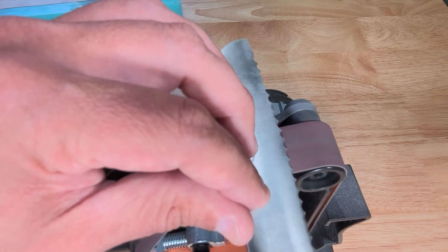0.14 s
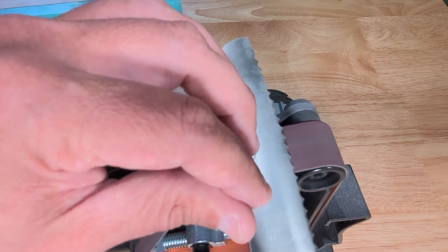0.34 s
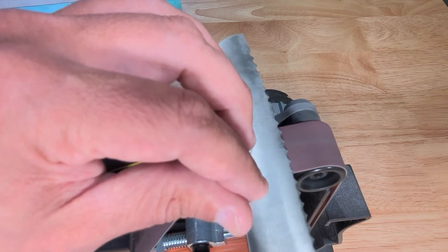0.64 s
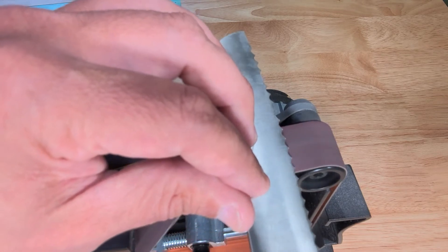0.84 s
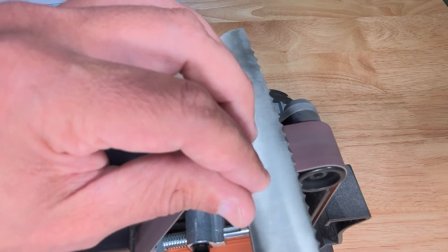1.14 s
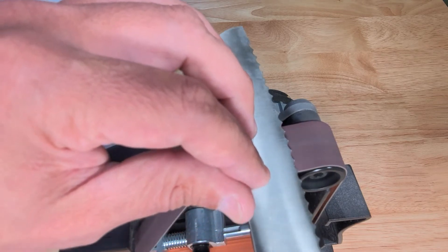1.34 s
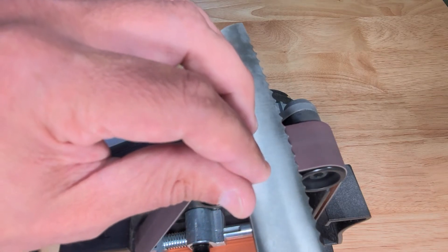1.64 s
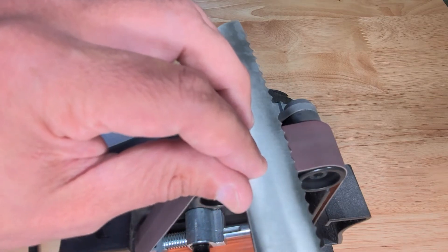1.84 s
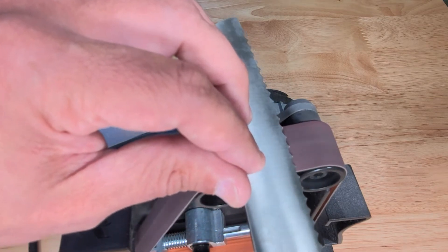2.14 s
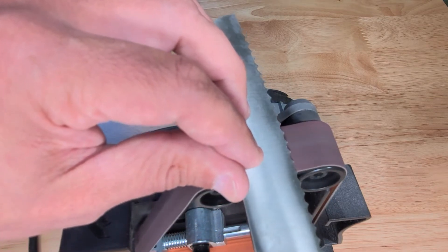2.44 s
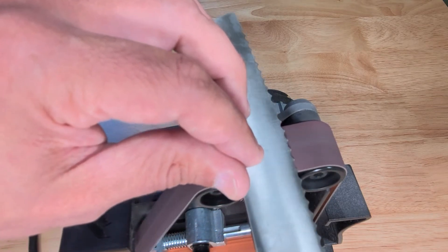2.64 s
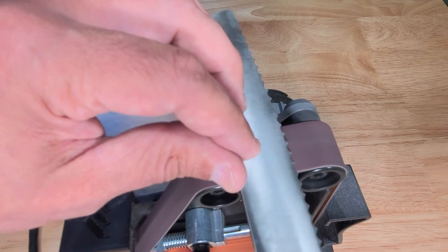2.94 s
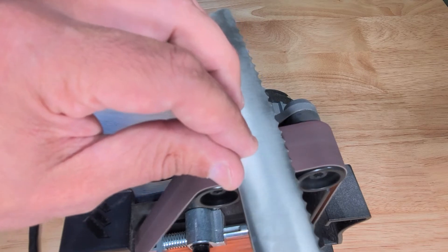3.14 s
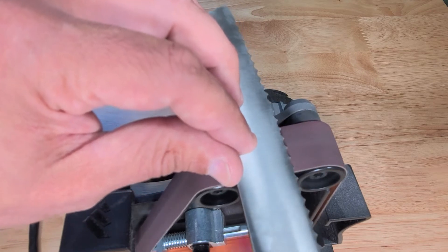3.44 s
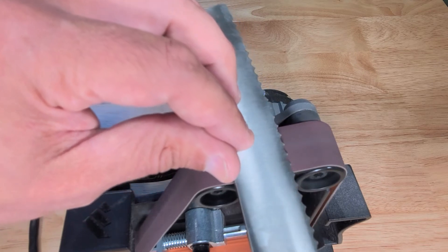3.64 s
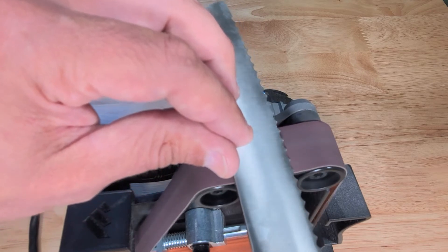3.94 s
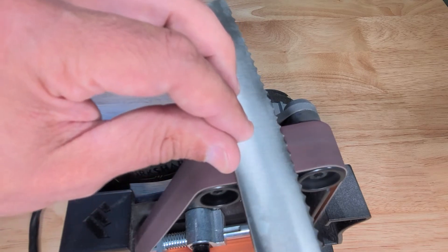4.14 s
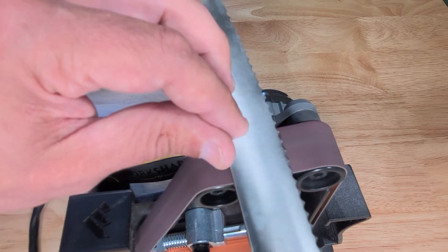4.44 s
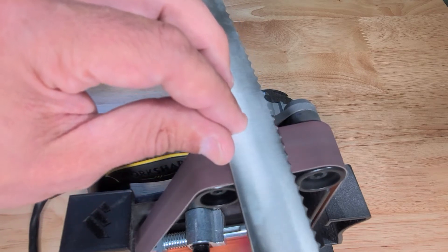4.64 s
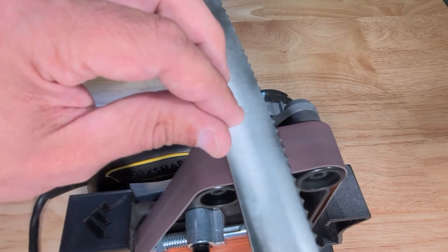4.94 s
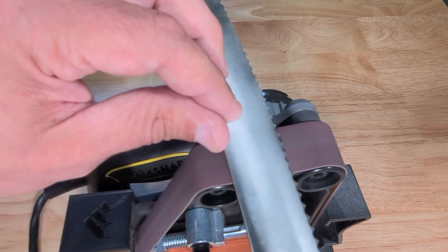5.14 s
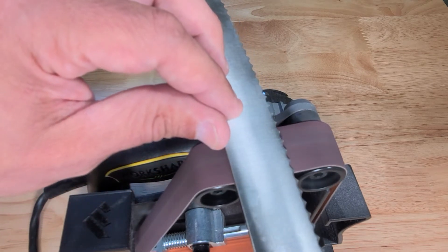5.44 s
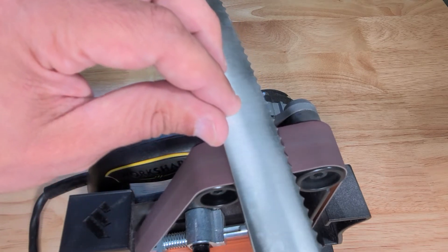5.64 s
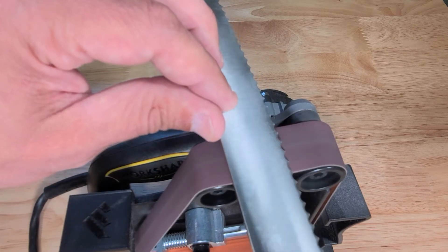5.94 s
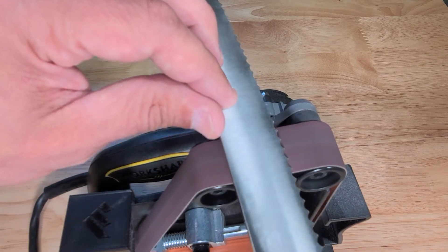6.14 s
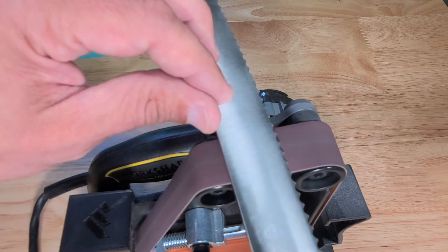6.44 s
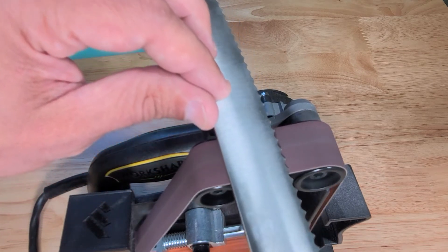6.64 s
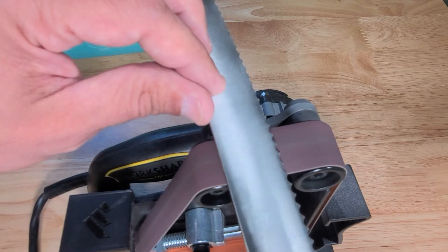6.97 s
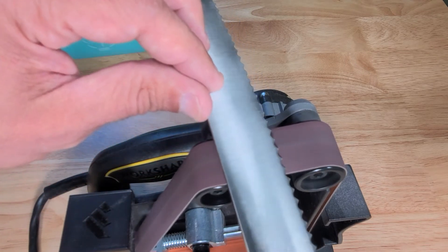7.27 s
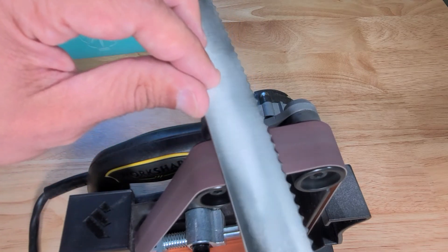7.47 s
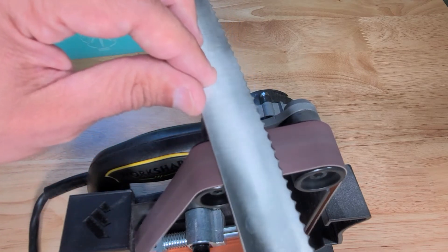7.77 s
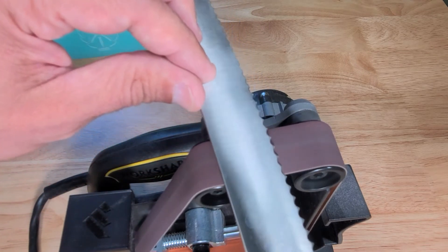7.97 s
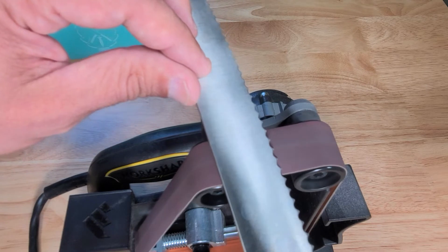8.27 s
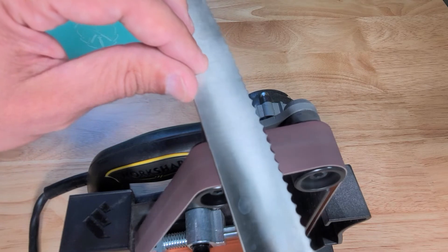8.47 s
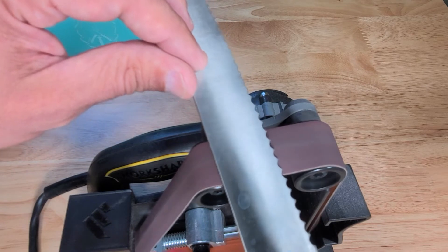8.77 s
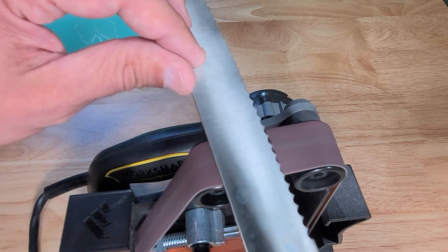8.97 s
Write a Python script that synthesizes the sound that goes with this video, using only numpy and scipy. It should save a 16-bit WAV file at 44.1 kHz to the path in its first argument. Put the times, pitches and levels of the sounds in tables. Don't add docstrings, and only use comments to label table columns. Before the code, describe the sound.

A small belt sander hums steadily while a serrated steel blade is drawn across the grit, giving a bright, metallic, pulsing hiss that peaks near three seconds.

```python
import sys
import numpy as np
from scipy import signal
from scipy.fft import rfft, irfft, next_fast_len
from scipy.io import wavfile
from scipy.ndimage import uniform_filter1d

SR = 44100
rng = np.random.default_rng(int(sys.argv[2]) if len(sys.argv) > 2 else 0)


def generate_wav(signal):
    frames = np.transpose(np.atleast_2d(signal))
    scaled = np.clip(frames, -1, 1) * 32767
    pcm = np.round(scaled).astype(np.int16)
    wavfile.write(sys.argv[1], SR, pcm)


def gain_from_db(level_db):
    decades = np.asarray(level_db, float) / 20
    return 10 ** decades


N = 401751
CONTROL_STEP = 40
TIME = np.arange(N) / SR
COARSE = np.arange(N // CONTROL_STEP + 2) * CONTROL_STEP / SR

PLACES_S = [
    1.0,
    2.702,
    4.9,
    7.0,
]
# lift_s, full_bite_s, ease_off_s, push_db, lift_depth_db
TEETH = [(-0.3, -0.064, 0.17, 1.5, 5.0), (0.487, 0.614, 0.8, 1.65, 3), (1.017, 1.372, 1.36, 2, 3),
         (1.617, 1.89, 1.95, 4, 4), (2.163, 2.455, 2.86, 7, 3), (2.83, 3.044, 3.15, 9.5, 3.5),
         (3.455, 3.78, 3.76, 7, 6), (4.094, 4.312, 4.52, 7, 4), (4.575, 4.843, 4.93, 4.5, 4.5),
         (5.04, 5.206, 5.6, 5, 4), (5.64, 5.852, 6.05, 4.5, 8), (6.15, 6.435, 6.57, 4.5, 9.5),
         (6.701, 6.944, 7.08, 4, 5), (7.308, 7.55, 7.72, 4, 3.5), (7.87, 8.13, 8.22, 3, 5),
         (8.293, 8.5, 8.65, 2.5, 3.5), (8.745, 9.03, 9.14, 3.5, 5)]
CATCH_S = 0.088
# start_s, length_ms, change_db
SKIPS = [(0.302, 12, 4), (0.439, 8, 6), (1.546, 8, 6), (1.566, 78, -3.5), (1.859, 75, 1), (2.049, 12, -6),
         (2.139, 33, -6), (2.682, 11, 2), (2.776, 40, 3.5), (2.832, 26, -4), (3.019, 18, 1.5),
         (3.225, 82, -5), (3.342, 26, -4), (3.706, 13, 4.5), (3.991, 20, 3.8), (4.594, 8, 5.5),
         (4.963, 26, -3), (5.42, 8.1, -4), (5.523, 40, 3.3), (5.763, 5.8, 8), (5.923, 68, 1.5),
         (5.998, 37, -4.5), (6.619, 17, -2), (6.715, 82, -5), (7.693, 24, -3), (7.974, 8, 5),
         (8.197, 40, -3), (8.299, 24, -5), (8.491, 12, 5.5), (8.91, 26, -3)]
# pitch_hz, width_hz, then level_db at each of the four places
BLADE_MODES = [(1660, 230, -13, -11.5, -10.5, -14), (1879, 134, -10.5, -6.5, -12, -6.5),
               (2577, 196, -5, -8, -4, -14), (2957, 154, -4.5, -5.5, -3.5, -8),
               (3700, 520, -11, -15.5, -16, -25), (4043, 430, -9.5, -5.5, -12.5, -9),
               (4903, 160, -4, -1.5, -8, -13), (5126, 360, -10, -8, -3, -0.5),
               (5540, 250, -2, -21, -21.5, -6), (6300, 300, -13, -20, -2, 1),
               (6660, 205, -5, -0.5, -14, -5.5), (7060, 400, -13, -14, -4, -5.5),
               (7470, 220, -9, -10, -8, -4.5)]
# pitch_hz, width_hz, then level_db at each of the four places
EDGE_MODES = [(7970, 230, 0, -3, 4, -0.5), (8290, 180, -11, -4.5, 0, 0.5), (8610, 590, -8.5, -2.5, -4, -9),
              (10710, 410, 0, -2.5, -15, -6), (11590, 114, -5, 0.5, 8.5, 6), (12170, 190, -3, 3.5, -9, -3),
              (12410, 250, -4, -12, -4, 5), (13060, 250, 7, 1, -1.5, -5), (13530, 280, -6, -9, 3, -14),
              (13960, 150, -5, -5, -9, -6), (14580, 360, 2, -6, -10, 4), (15100, 400, -4, -6, -1, -15),
              (15400, 280, -10, -5, -9, -17)]
GROUP_SPLIT_HZ = (2250, 3400, 5900, 9800)
IDLE_DB = (-41.5, -42, -57, -44.5, -30)
# share_at_catch (0-1), sag_db_per_s, delay_s
BITE_ANSWER = [(.1, 14, 0.02), (.32, 22.5, -0.014), (.43, 23, 0.00004), (1.06, 36, 0.053)]
GROUP_DB = [(-30, -40.5, -31.5, -36.5), (-29, -33, -36, -31), (-27.5, -31, -25, -26.5),
            (-22.5, -28.5, -25, -26)]
GROUP_SWING = [(2.8, 1.37, 1.1, 0.83), (1.65, 0.68, 0.63, 1.8), (1.2, .8, 1.07, 1.1),
               (0.33, 0.48, .42, 0.86)]
# pitch_hz,
# width_hz, tip_depth (0-1), heel_depth (0-1)
NOTCHES = [(1165, 270, 0.11, 0.3), (2253, 77, 0.6, 0.19), (3330, 150, 0.1, 0.6), (4500, 100, .4, 0.57),
           (9960, 2550, 0.54, 0.33)]

MAINS_HZ = 59.983
PULSE_TURN, PULSE_START = 0.31, 0.68
# left_db, right_db (rms)
HUM = [(-63, -68), (-45.5, -51), (-43, -52.5), (-30.5, -36), (-33, -42.5), (-40.5, -55), (-64, -49),
       (-68, -56), (-65, -75.5), (-46, -62), (-46.5, -60), (-57, -58), (-44.5, -47.5), (-47.5, -63),
       (-39.5, -51.5), (-41, -60), (-46.5, -58), (-67, -73.5), (-57, -69), (-61, -67), (-53.5, -66.5)]
ROLLER_HZ, ROLLER_DB = 62.6, -46.5
PULLEY_TURN_S = 0.1716
# pitch_hz, level_db_per_hz
RUMBLE = [(15, -88), (30, -80), (55, -67.5), (95, -69.5), (108, -84), (135, -68), (160, -71), (200, -66),
          (230, -61.5), (400, -66), (900, -60.5), (1200, -64.5), (2200, -68.5), (6000, -66)]
# pitch_hz, width_hz, level_db_per_hz
HOUSING = [(59.7, 5.1, -64), (156.4, 16, -56.5), (196, 23, -55.5), (273, 14, -52.5), (317.5, 8.1, -52.5),
           (342, 14, -53.5), (389.4, 8.6, -57.5), (438, 27, -58.5), (513, 27, -57), (632, 14, -55.5),
           (757.6, 14, -53), (790, 27, -60), (929, 28, -53), (980, 38, -58.5)]

# pitch_hz, gain_db, phase_rad, likeness (0-1)
PORTS = [(40, -1.0, -0.68, 0.93), (70, -2.5, -0.75, 0.99), (120, -6.4, -1.14, 0.88),
         (180, -5.8, -0.69, 0.76), (250, -6.1, -1.78, 0.96), (350, -9.7, -2.7, 0.82),
         (500, -8.8, -3.33, 0.82), (800, -7.9, -3.69, 0.86), (1300, -10.0, -3.84, 0.86),
         (2000, -13.0, -4.09, 0.85), (3200, -15.2, -4.25, 0.78), (5000, -20.1, -4.56, 0.68),
         (8000, -24.1, -4.64, 0.65), (12000, -25.5, -4.62, 0.49), (15500, -29.2, -4.68, 0.35)]
CUTOFF_HZ = 15770


def blade():
    grains = [grit(per_s=14000, spread_db=3.5) for _ in range(3)]
    groups = np.zeros((5, N))
    powers = np.zeros((5, len(COARSE)))
    for k, (hz, width, *place_db) in enumerate(BLADE_MODES + EDGE_MODES):
        group = np.searchsorted(GROUP_SPLIT_HZ, hz)
        gain = gain_from_db(np.interp(COARSE, PLACES_S, place_db) + 1.27 * drift(2.6))
        powers[group] += gain ** 2 * width
        flutter = smooth(gain * gain_from_db(1.17 * drift(12.5)))
        groups[group] += flutter * resonate(grains[k % 3], hz, width) * (-1) ** (k // 3)

    bites_db = [bite_db(*group) for group in zip(BITE_ANSWER, GROUP_DB, GROUP_SWING)]
    platen_db = 0.47 * bites_db[1] - 24.5 + 4.2 * COARSE / COARSE[-1]
    levels_db = [platen_db, *bites_db]
    chatter_shares = (0.18, 0.48, 0.89, 0.71, 0.77)
    chatter = chatter_db()
    out = np.zeros(N)
    for ring, power, db, idle_db, share in zip(groups, powers, levels_db, IDLE_DB, chatter_shares):
        level = np.hypot(smooth(gain_from_db(db)), gain_from_db(idle_db))
        out += level * gain_from_db(share * chatter) * rms_one(ring / smooth(np.sqrt(power)))
    return gain_from_db(6.0) * near_echoes(out, count=7, echo_db=-3.0, decay_s=0.0046)


def bite_db(answer, level_db, swing):
    lift, full, ease, push_db, depth_db = np.transpose(TEETH)
    caught, sag_db_per_s, delay = answer
    catch_db = caught * (push_db + depth_db) - depth_db
    sagged_db = push_db - sag_db_per_s * (ease - full)
    s = np.ravel([lift, lift + CATCH_S, full + delay, ease], order="F")
    db = np.ravel([-depth_db, catch_db, push_db, sagged_db], order="F")
    bite = np.interp(COARSE, np.maximum.accumulate(s), db)
    return np.interp(COARSE, PLACES_S, level_db) + np.interp(COARSE, PLACES_S, swing) * bite


def chatter_db():
    out = smooth(0.3 * drift(11) + 1.36 * drift(77) + 1.3 * drift(200))
    for s, ms, db in SKIPS:
        half = int(ms * SR / 1000) + 1
        at = round(s * SR) - half
        out[at:at + 2 * half] += 1.3 * db * np.hanning(2 * half)
    return out


def grit(per_s, spread_db):
    hardness_db = spread_db * np.minimum(rng.exponential(1, N), 4.5)
    sizes = gain_from_db(hardness_db) * rng.choice([-1, 1], N)
    return rms_one(sizes * (rng.random(N) < per_s / SR))


def resonate(x, hz, width):
    r = np.exp(-np.pi * width / SR)
    poles = [1, -2 * r * np.cos(2 * np.pi * hz / SR), r * r]
    return signal.lfilter([(1 - r * r) / 2, 0, (r * r - 1) / 2], poles, x)


def near_echoes(x, count, echo_db, decay_s):
    size = next_fast_len(N + 3000)
    taps = np.arange(1, 2500)
    spectrum, out = rfft(x, size), 0
    for k in range(count):
        echo = rng.standard_normal(len(taps)) * np.exp(-taps / (decay_s * SR))
        comb = rfft(np.r_[1, echo * gain_from_db(echo_db) / np.sqrt(np.sum(echo ** 2))], size)
        comb /= np.sqrt(uniform_filter1d(abs(comb) ** 2, size=3000))
        away = np.clip(TIME / TIME[-1] * (count - 1) - k, -1, 1)
        share = np.cos(np.pi / 2 * away) ** 1.5
        out += share * irfft(spectrum * comb, size)[:N]
    return out


def motor():
    roller_level = smooth(gain_from_db(ROLLER_DB + 1.8 * drift(0.59)))
    roller_turn = 2 * np.pi * ROLLER_HZ * TIME + smooth(0.61 * drift(0.85))
    roller = roller_level * np.sin(roller_turn - np.array([[0], [0.75]]))
    out = roller * gain_from_db(np.array([[0], [-2.5]]))
    for order, db in enumerate(HUM, 1):
        turn = 2 * np.pi * (order * (MAINS_HZ * TIME + PULSE_TURN) + PULSE_START)
        turn += 2 * np.pi * rng.random() * (order > 6)
        lag = np.array([[0], [at_hz(PORTS, order * MAINS_HZ)[1]]])
        waver = smooth(gain_from_db((0.5 + 0.087 * order) * drift(3.4)))
        out += gain_from_db(np.array(db))[:, None] * waver * np.cos(turn + lag)
    return np.sqrt(2) * out


def pulleys():
    length = round(PULLEY_TURN_S * SR)
    order = np.arange(length // 2 + 1)
    blur = np.clip(order / 150, 0, 1) * rng.random(len(order))
    turn = irfft(np.exp(-2j * np.pi * (0.012 * order ** 2 + 0.09 * order + blur)), length)
    wander = np.arange(N) - 0.055 * SR + 0.00049 * SR * smooth(drift(0.63))
    thumps = np.interp(wander, np.arange(length), turn, period=length)
    looped = rms_one(thumps * smooth(gain_from_db(0.73 * drift(1.3))))

    hz = np.arange(N // 2 + 1) * SR / N
    repeat = np.clip(0.83 / (1 + (hz / 260) ** 4) * (hz > 75), 0, 1)
    power = gain_from_db(2 * at_hz(RUMBLE, hz)[0])
    for pitch, width, db in HOUSING:
        power += gain_from_db(2 * db) / (1 + (2 * (hz - pitch) / width) ** 2) ** 2
    mix = np.sqrt(repeat) * rfft(looped) + np.sqrt(1 - repeat) * rfft(rng.standard_normal(N))
    return smooth(gain_from_db(1.2 * drift(35))) * irfft(mix * np.sqrt(power * SR / 2), N)


def ports(x):
    size = next_fast_len(N + 20000)
    hz = np.arange(size // 2 + 1) * SR / size
    gain_db, phase, alike = at_hz(PORTS, hz)
    alike = alike ** 0.63
    paths = rfft(rng.standard_normal(6000) * np.exp(-np.arange(6000) / 1500), size)
    scattered = rfft(x * smooth(drift(44)), size) * paths / abs(paths)
    direct = rfft(x, size) * np.exp(1j * phase)
    top = hz / CUTOFF_HZ
    gain = gain_from_db(gain_db + 1.8 * top - 8.6 * top ** 24)
    right = gain * (alike * direct + np.sqrt(1 - alike ** 2) * scattered)
    return np.array([x, irfft(right, size)[:N]])


def rms_one(x):
    return x / np.sqrt(np.mean(x ** 2) + 1e-20)


def at_hz(rows, hz):
    f, *columns = np.transpose(rows)
    return [np.interp(np.log(hz + 1), np.log(f), c) for c in columns]


def drift(rate_hz):
    r = np.exp(-2 * np.pi * CONTROL_STEP * rate_hz / SR)
    noise = rng.standard_normal(len(COARSE) + 2000)
    return rms_one(signal.lfilter([1], [1, -2 * r, r * r], noise)[2000:])


def smooth(control):
    return np.interp(TIME, COARSE, control)


def scene():
    noise = blade() + pulleys()
    for hz, width, tip_depth, heel_depth in NOTCHES:
        depth = np.clip(np.linspace(tip_depth, heel_depth, N), 0, 0.97)
        noise -= depth * resonate(noise, hz, width)
    return ports(noise) + motor()


def drop_masked(x, left_db, right_db):
    _, _, z = signal.stft(x, nperseg=2048, noverlap=1024, window="cosine")
    power = abs(z[:, :1024].reshape(2, 128, 8, -1)) ** 2
    band = np.repeat(np.mean(power, axis=2), 8, axis=1)
    lasting = uniform_filter1d(band, size=5, axis=2)
    around = [uniform_filter1d(side, size=bins, axis=0) for side, bins in zip(lasting, (140, 24))]
    masked = band < around * gain_from_db(2 * np.array([left_db, right_db]))[:, None, None]
    masked[:, :100] = False
    z[:, :1024] *= ~masked
    return signal.istft(z, nperseg=2048, noverlap=1024, window="cosine")[1][:, :N]


def roll_off(x):
    return signal.sosfilt(signal.butter(12, 15800, fs=SR, output="sos"), x)


def record(dry):
    rounded = dry / (1 + (dry / 0.97) ** 6) ** (1 / 6)
    steep = signal.ellip(16, 0.3, 95, CUTOFF_HZ, fs=SR, output="sos")
    cut = signal.sosfilt(steep, rounded)
    mix = drop_masked(cut, left_db=-10.5, right_db=-2.6)
    return roll_off(mix)


dry = scene()
out = record(dry)
generate_wav(out)
```